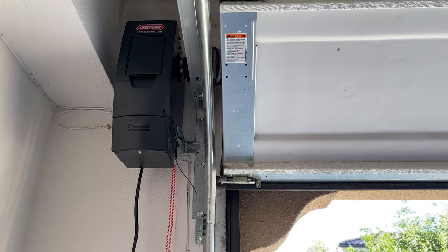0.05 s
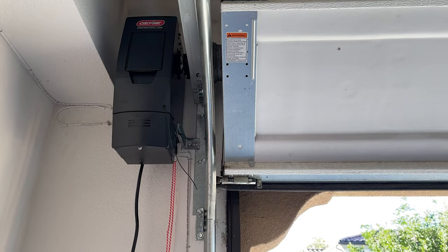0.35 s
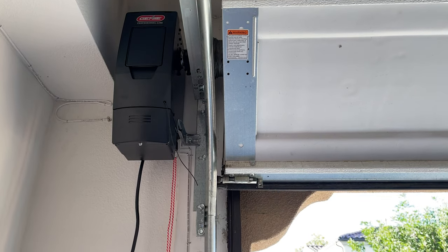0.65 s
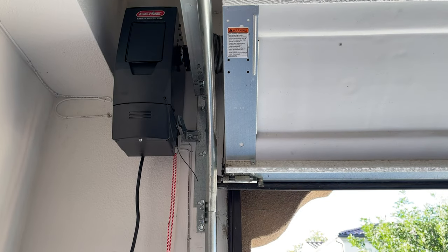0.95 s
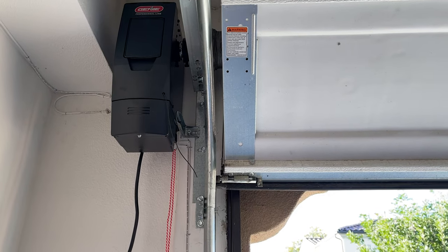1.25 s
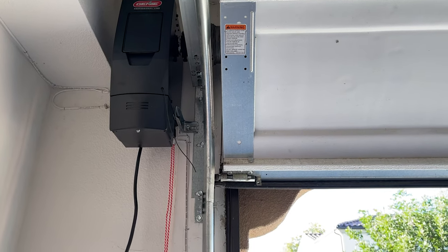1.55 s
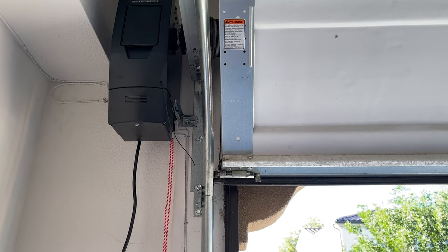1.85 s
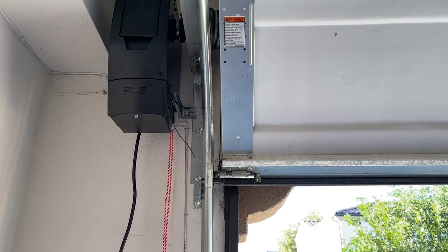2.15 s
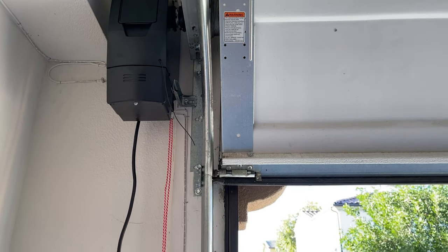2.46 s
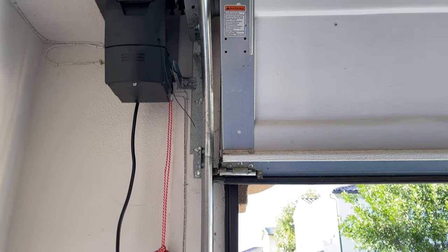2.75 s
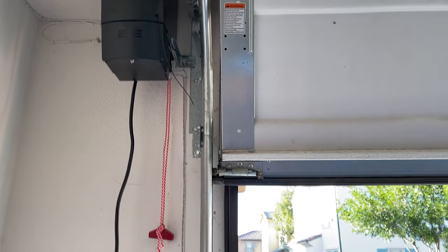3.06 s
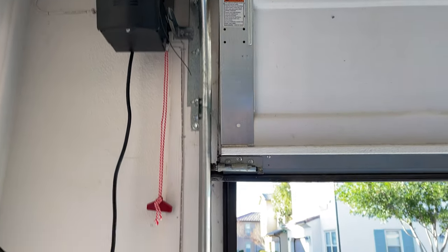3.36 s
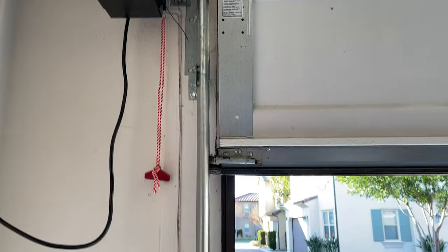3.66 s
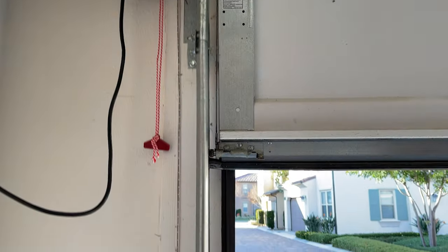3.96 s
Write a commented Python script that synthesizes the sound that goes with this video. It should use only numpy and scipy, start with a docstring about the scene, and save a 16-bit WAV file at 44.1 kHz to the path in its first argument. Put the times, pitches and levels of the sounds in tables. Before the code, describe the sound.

A garage door opener lifts a sectional door, heard close with a short echo. For the first two seconds, rapid double knocks, sharp hinge clicks, clatter and dull thumps sound over a low rumble. From about 2 seconds the electric motor whines, rising in pitch. A roller clanks near 2.8 seconds. From about 3.2 seconds the whine holds steady with a low hum until 4 seconds.

```python
"""Paired knocks, clicks and clatter over a low rumble, then a rising, many-toned whine with a low hum.
A wall-mounted opener lifts a sectional garage door. As it creeps, the drive takes up slack, the panel
joints snap and the door booms. The motor then runs up to a steady speed, its shaft harmonics sweeping
the housing's resonances; a roller clanks in the track. The bare garage echoes the impacts."""
import sys
import numpy as np
from scipy import signal
from scipy.fft import rfft, irfft, next_fast_len
from scipy.io import wavfile
from scipy.ndimage import uniform_filter1d

SR = 44100
rng = np.random.default_rng(int(sys.argv[2]) if len(sys.argv) > 2 else 0)


def to_wav(s):
    """Save 16-bit WAV."""
    ch = np.atleast_2d(s).T  # columns
    pcm = np.round(np.clip(ch, -1, 1) * 32767)  # PCM
    wavfile.write(sys.argv[1], SR, pcm.astype(np.int16))


N = 176400

# moving door, envelopes: time_s, level_db
RUMBLE_LEVEL = [(0.0, -40), (1.19, -38.5), (1.32, -52), (1.49, -32.5), (1.68, -41), (1.71, -32.5),
                (2.1, -47.5), (3.64, -42.5), (3.68, -56), (4.0, -48)]
BOOM_LEVEL = [(0.0, -39.5), (0.62, -39), (0.71, -42.5), (0.8, -33), (0.92, -42.5), (1.43, -41.5),
              (1.45, -37), (2.45, -47), (2.68, -38), (3.82, -37), (3.84, -46), (4.0, -36.5)]
PANEL_LEVEL = [(0.0, -31.5), (0.02, -41), (1.93, -44), (2.1, -56), (2.67, -51), (3.95, -49.5), (4.0, -51)]
ROLLER_LEVEL = [(0.0, -43), (1.12, -48), (1.32, -40), (1.68, -42), (1.9, -53.5), (2.43, -51), (2.99, -46.5),
                (4.0, -49)]
# moving door, spectra: freq_hz, gain_db
RUMBLE_COLOUR = [(18, -61), (26, -26), (37, -26), (48, -17), (60, 3.5), (76, 2), (95, -14), (200, -78)]
BOOM_COLOUR = [(40, -41), (70, -5), (90, 4), (122, 1.5), (155, -26), (260, -48.5)]
PANEL_COLOUR = [(100, -57), (150, 8), (235, 5.5), (320, 2), (450, -16), (800, -69)]
ROLLER_COLOUR = [(200, 7.5), (380, 2), (550, 0.5), (800, -0.5), (1500, -8.5), (2600, -15.5), (4000, -30),
                 (7000, -59), (13000, -55)]
# drive resonances: pitch_hz, gain_db, t60_s
KNOCK_MODES = [(270, 2.5, 0.037), (362, -7, 0.027), (212, -12, 0.046), (489, -7.5, 0.033)]
# hinge snaps: start_s, level_db, tilt_db_per_octave
CLICKS = [(0.0215, -28.5, 3), (0.0435, -31.5, 3.5), (.135, -29.5, 3), (0.4314, -28, 3.5),
          (0.7016, -20.5, 4.5), (0.7802, -18, 0.5), (1.223, -22, -2.5), (1.2565, -23.5, -1),
          (1.3249, -25, -3), (1.418, -29.5, 6), (1.697, -25, -0.5), (1.7237, -33.5, 7), (1.7414, -25.5, -2),
          (1.7696, -23, 2), (2.776, -30, -11), (2.9119, -28, -4)]
# panels and rollers shifting: start_s, level_db, t60_s, tilt_db_per_octave
CLATTERS = [(.141, -34.5, 0.19, 2.5), (.245, -38, 0.06, -3), (.343, -35, 0.073, -6.5),
            (.522, -35, 0.11, -8.5), (.607, -42, 0.24, -3), (.703, -34, 0.18, -9.5),
            (.785, -37.5, 0.29, -4), (1.126, -38.5, 0.34, 2), (1.217, -33, 0.19, -5),
            (1.503, -37.5, 0.42, -32), (1.72, -39, 0.2, -3), (1.775, -44.5, 0.46, -1),
            (2.137, -40.5, 0.14, -13), (2.768, -36.5, 0.29, 0.5), (2.913, -36, 0.13, 2.5)]
# snap and clatter spectra: freq_hz, gain_db
CLICK_COLOUR = [(200, 19), (700, 6.5), (1300, -2.5), (1900, 15), (2400, -7), (2900, 10.5), (3400, -2.5),
                (4000, 6.5), (5000, -6), (6400, -1.5), (8500, -12), (11500, -9.5), (13500, -27.5)]
CLATTER_COLOUR = [(150, -48), (400, 3.5), (800, 5.5), (1300, 5.5), (1900, -1.5), (2900, -1.5), (3800, -14),
                  (6500, -14.5), (11500, -15), (13500, -44)]
# door lurches: start_s, level_db
THUMPS = [(0.159, -21), (0.366, -23.5), (.448, -21), (0.589, -25), (1.447, -19.5), (1.525, -21.5),
          (1.8, -23)]
# motor shaft: time_s, speed_hz
SHAFT_SPEED = [(1.88, 20.4), (2.1, 36), (2.4, 57.2), (2.7, 78), (3.075, 103), (3.15, 105.6), (3.22, 106.35),
               (3.35, 106.4), (3.5, 106.75), (3.72, 106.98), (3.88, 106.55), (4, 106.6)]
# housing response to ordinary and to rotor-slot harmonics: freq_hz, level_db
HOUSING = [(100, -58), (210, -52), (320, -46), (450, -58), (700, -70), (1300, -76), (2200, -77),
           (2700, -71), (3100, -79), (4000, -88), (5700, -75), (7100, -80), (7700, -71), (8400, -65),
           (9000, -67), (9600, -76), (11300, -69), (12800, -76)]
SLOT_RESPONSE = [(300, -58), (520, -51), (650, -68), (1000, -78), (1230, -62), (1450, -73), (1900, -67),
                 (2250, -62), (2450, -70), (2750, -61), (3100, -72), (4000, -84), (4220, -65), (4450, -86),
                 (7600, -74), (8250, -52), (9700, -76), (11500, -63), (13000, -80)]
# shaft harmonics driven by the rotor slots: order
SLOT_ORDERS = (24, 36, 48, 60, 96, 108, 120)
# prominent harmonics at full speed, before lift: pitch_hz, level_db
LOW_TONES = [(425.3, -58), (532.9, -55), (1281, -66), (2245, -76), (2449, -69), (2562, -66), (2670, -68),
             (4910, -76), (5879, -76), (6406, -68)]
HIGH_TONES = [(7580, -63), (7687, -65), (7887, -70), (8123, -63), (8220, -70), (8328, -75), (8436, -67),
              (8527, -71), (8861, -65), (8952, -63), (9378, -70)]
TOP_TONES = [(11100, -71), (11208, -72), (11440, -73), (11978, -70)]
# their lift: freq_hz, gain_db
TONE_LIFT = [(500, 3), (2500, 6.5), (7500, 8)]
# bearing spectra: freq_hz, gain_db
HISS_COLOUR = [(3000, -27), (4300, -23), (5700, -14), (6900, -18), (8300, 0), (9000, -4), (9700, -16),
               (11400, -16), (13300, -45)]
FIZZ_COLOUR = [(7000, -30), (8300, -4), (11400, 0), (12400, -4), (13200, -30)]
# steel track resonances: pitch_hz, gain_db, t60_s
CLANK_MODES = [(882, -2.5, 0.18), (1170, -1.5, 0.32), (1315, -0.5, 0.25), (1587, -2, 0.13),
               (1780, 1, 0.069), (2710, 2, 0.054)]
# gear hum envelope, before speed scaling: time_s, level_db
GEAR_LEVEL = [(2.9, -60), (2.952, -67), (3.208, -32.5), (3.246, -39.5), (3.666, -33), (4.0, -41.5)]
# room decay: freq_hz, t60_s
GARAGE_DECAY = [(200, 0.16), (2000, 0.39), (10000, 0.12)]
# left-right likeness of noise: freq_hz, correlation
COHERENCE = [(100, 1), (250, 0.89), (500, 0.18), (1000, 0.19), (2000, 0.41), (4000, 0.35), (8000, 1),
             (12000, 0.14)]
# left microphone over right: freq_hz, gain_db
MIC_BALANCE = [(60, 0), (250, 1.2), (1500, 2.5), (4000, 4), (8000, 2), (12000, -0.5)]
# treble notch: freq_hz, gain_db
MIC_NOTCH = [(9400, 1), (9900, -7.5), (10250, -26), (10650, -6), (11100, 0.5)]
# left microphone's lead: freq_hz, phase_rad
MIC_LEAD = [(100, 0), (2500, .4), (8000, 1.1), (11500, .6)]

FULL_SPEED_HZ = 106.8


def amp(db):
    """Decibels to gain."""
    return 10 ** (np.asarray(db) / 20)


def along(points, hz):
    """Interpolate (freq_hz, value) rows on a log axis."""
    freq_hz, values = np.transpose(points)
    return np.interp(np.log(hz + 1), np.log(freq_hz + 1), values)


def curve(rows):
    """Interpolate (time_s, value) rows per sample."""
    return np.interp(np.arange(N) / SR, *np.transpose(rows))


def wobble(rate_hz):
    """Random curve through Gaussian knots."""
    return np.interp(np.arange(N) * rate_hz / SR, np.arange(4096), rng.standard_normal(4096))


def filtered(x, response):
    """Apply a frequency response."""
    size = x.shape[-1]
    padded = next_fast_len(size + 8192)
    return irfft(rfft(x, padded) * response(np.fft.rfftfreq(padded, 1 / SR)), padded)[..., :size]


def noise(colour, size=N, tilt_db=0, spread=1):
    """Coloured stereo noise, rms 1; tilt per octave above 500 Hz; spread 0 is mono."""
    def response(hz):
        width_rad = spread * np.arccos(np.clip(along(COHERENCE, hz), -1, .995)) / 2
        gain = amp(along(colour, hz) + tilt_db * np.log2(np.maximum(hz, 500) / 1000))
        return gain * [np.cos(width_rad), np.sin(width_rad)]

    mid, side = filtered(rng.standard_normal((2, size)), response)
    stereo = np.array([mid + side, mid - side])
    return stereo / np.sqrt(np.mean(stereo ** 2) + 1e-20)


def even(x):
    """Flatten the chance swells of noise."""
    power = uniform_filter1d(np.mean(x ** 2, axis=0), size=SR // 12)
    return x / np.sqrt(np.abs(power) + 1e-6)


def add(track, start_s, sound):
    """Mix a sound in."""
    part = track[..., max(round(start_s * SR), 0):][..., :sound.shape[-1]]
    part += sound[..., :part.shape[-1]]


def moving_door():
    """The door rumbles and booms, its panels drone, its rollers run in the track."""
    rumble = amp(curve(RUMBLE_LEVEL)) * even(noise(RUMBLE_COLOUR))
    boom = amp(curve(BOOM_LEVEL)) * even(noise(BOOM_COLOUR))
    panels = amp(curve(PANEL_LEVEL)) * noise(PANEL_COLOUR)
    rollers = amp(curve(ROLLER_LEVEL) + 0.42 * wobble(33.86)) * noise(ROLLER_COLOUR)
    return rumble + boom + panels + rollers


def drive_knocks(count=20, first_s=.0075, period_s=.0982, pair_s=.022, attack_s=.0035, level_db=-23):
    """The creeping drive takes up slack in regular double knocks."""
    out, t = np.zeros(N), np.arange(SR // 8) / SR
    attack = 1 - np.exp(-(t / attack_s) ** 2)
    for k in range(count):
        for delay_s in (0, pair_s):
            ring = np.zeros(len(t))
            for hz, db, t60_s in KNOCK_MODES:
                decay = amp(db + rng.normal(0, 2.95) - 60 * t / t60_s)
                ring += decay * np.sin(2 * np.pi * hz * rng.normal(1, 0.047) * t)
            add(out, first_s + k * period_s + delay_s, amp(level_db) * ring * attack)
    return out


def hinge_clicks(attack_s=.0004, crack_t60_s=0.019, tail_t60_s=0.13, tail_db=-16.5, trim_db=-1.5):
    """Each hinge snaps at its own pitch and leaves a short metallic tail."""
    out, t = np.zeros((2, N)), np.arange(SR // 3) / SR
    attack = 1 - np.exp(-t / attack_s)
    for start_s, db, tilt_db in CLICKS:
        colour = np.array(CLICK_COLOUR) * [rng.lognormal(0, 0.1), 1]
        crack = amp(-60 * t / crack_t60_s) * noise(colour, len(t), tilt_db, spread=0.23)
        tail = amp(tail_db - 60 * t / tail_t60_s) * noise(CLICK_COLOUR, len(t), tilt_db)
        add(out, start_s, amp(db + trim_db) * (crack + tail) * attack)
    return out


def panel_clatter(attack_s=0.0019, grain_db=3.5):
    """Panels and rollers shift in grainy bursts."""
    out, t = np.zeros((2, N)), np.arange(SR // 3) / SR
    attack = 1 - np.exp(-t / attack_s)
    for start_s, db, t60_s, tilt_db in CLATTERS:
        decay = amp(db - 60 * t / t60_s + grain_db * wobble(249)[:len(t)])
        add(out, start_s, attack * decay * noise(CLATTER_COLOUR, len(t), tilt_db))
    return out


def panel_thumps(attack_s=0.0081, t60_s=0.22):
    """Each lurch sets a panel booming briefly."""
    out, t = np.zeros(N), np.arange(SR // 3) / SR
    attack = 1 - np.exp(-t / attack_s)
    for start_s, db in THUMPS:
        pitch_hz = rng.normal(98.7, 10.2)
        add(out, start_s, amp(db - 60 * t / t60_s) * attack * np.sin(2 * np.pi * pitch_hz * t))
    return out


def motor_whine(speed_hz, shaft_rad, waver_db=1.8):
    """Shaft harmonics sweep the housing's resonances; rotor slots sing during the run-up."""
    grid = np.arange(0, N, 128)
    grid_hz = speed_hz[grid]
    pace = grid_hz / FULL_SPEED_HZ
    run_up = np.clip((grid_hz - grid_hz[0]) / 2, 0, 1) * (1 - pace ** 30)
    prominent_db = {round(hz / FULL_SPEED_HZ): db + along(TONE_LIFT, hz)
                    for hz, db in LOW_TONES + HIGH_TONES + TOP_TONES}
    out = np.zeros((2, N))
    for order in range(2, 122):
        hz = order * grid_hz
        usual_db = along(HOUSING, order * FULL_SPEED_HZ)
        full_speed_db = prominent_db.get(order, usual_db + rng.normal(-1, 2))
        db = along(HOUSING, hz) + (full_speed_db - usual_db) * pace ** 16
        growth = along([(500, 2.6), (7000, 2)], hz)  # low tones grow faster with speed
        gain = amp(db) * pace ** growth
        if order in SLOT_ORDERS:
            slot_gain = amp(along(SLOT_RESPONSE, hz) + 4.8 * wobble(20)[grid])
            gain += slot_gain * run_up * np.minimum(1, pace * 100 / order)
        waver = amp(waver_db * (2 if 20 < order < 62 else 1) * wobble(70))
        envelope = np.interp(np.arange(N), grid, gain) * waver
        phase_rad = order * shaft_rad + rng.uniform(0, 2 * np.pi)
        stereo_rad = rng.normal(0, .3) * np.array([[1], [-1]])
        out += envelope * np.sin(phase_rad + stereo_rad)
    return out


def bearing_hiss(pace, hiss_db=-58, fizz_db=-58.5):
    """Bearing noise grows with speed, its bright fizz fastest."""
    hiss = amp(hiss_db) * pace ** .5 * noise(HISS_COLOUR, spread=.5)
    fizz = amp(fizz_db) * pace ** 2 * noise(FIZZ_COLOUR, spread=.45)
    return amp(wobble(40.3)) * (hiss + fizz)


def roller_clank(start_s=2.772, level_db=-34.5, attack_s=0.0028):
    """A roller knocks into the curve of the steel track."""
    out, t = np.zeros((2, N)), np.arange(SR // 4) / SR
    attack = 1 - np.exp(-t / attack_s)
    for hz, db, t60_s in CLANK_MODES:
        jitter_rad = 1.64 * np.array([wobble(158), wobble(147)])[:, :len(t)]
        ring = np.sin(2 * np.pi * hz * t + jitter_rad)
        add(out, start_s, amp(level_db + db - 60 * t / t60_s) * attack * ring)
    return out


def gear_hum(pace, shaft_rad, order=2.571):
    """The gear's low tone follows the shaft and emerges near full speed."""
    envelope = amp(curve(GEAR_LEVEL) + 1.3 * wobble(14)) * pace ** 4
    return envelope * np.sin(order * shaft_rad + .2 * wobble(20))


def garage_echo(x, level_db=-8, delay_samples=200):
    """The room's tail, each frequency dying at its own rate."""
    hz, t, spectrum = signal.stft(rng.standard_normal((2, SR // 2)), SR, nperseg=256)
    decay = amp(-60 * t / along(GARAGE_DECAY, hz)[:, None])
    tail = signal.istft(spectrum * decay, SR, nperseg=256)[1]
    tail /= np.linalg.norm(tail[0])
    delayed = np.pad(x.mean(0), (delay_samples, 0))[None]
    return amp(level_db) * signal.fftconvolve(delayed, tail, axes=1)[:, :N]


def scene():
    """Impacts and their echo over the motor and the moving door."""
    impacts = hinge_clicks() + panel_clatter() + drive_knocks() + roller_clank()
    echo = garage_echo(impacts)
    speed_hz = curve(SHAFT_SPEED)
    shaft_rad = 2 * np.pi * np.cumsum(speed_hz * (1 + .0002 * wobble(40))) / SR
    pace = speed_hz / FULL_SPEED_HZ
    motor = motor_whine(speed_hz, shaft_rad) + gear_hum(pace, shaft_rad) + bearing_hiss(pace)
    return impacts + echo + motor + moving_door() + panel_thumps()


def record(dry, lowpass_hz=12900):
    """Two close microphones, the left nearer, with a treble notch; a low-pass then cuts the top treble."""
    def response(hz):
        side = np.array([[.5], [-.5]])
        gain = amp(side * along(MIC_BALANCE, hz) + along(MIC_NOTCH, hz))
        lead = np.exp(1j * along(MIC_LEAD, hz) * side)
        return gain * lead / np.sqrt(1 + (hz / lowpass_hz) ** 100)

    return filtered(dry, response)


dry = scene()
out = record(dry)
to_wav(out)
```